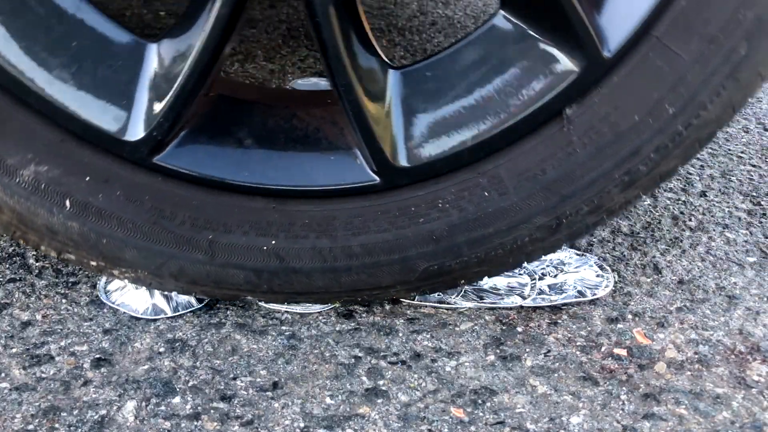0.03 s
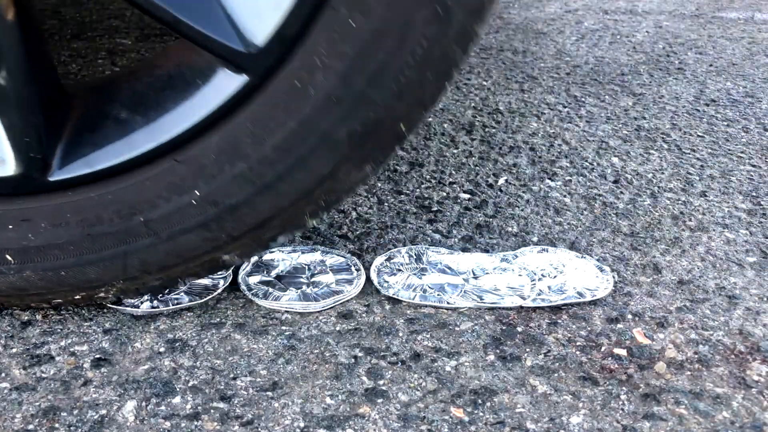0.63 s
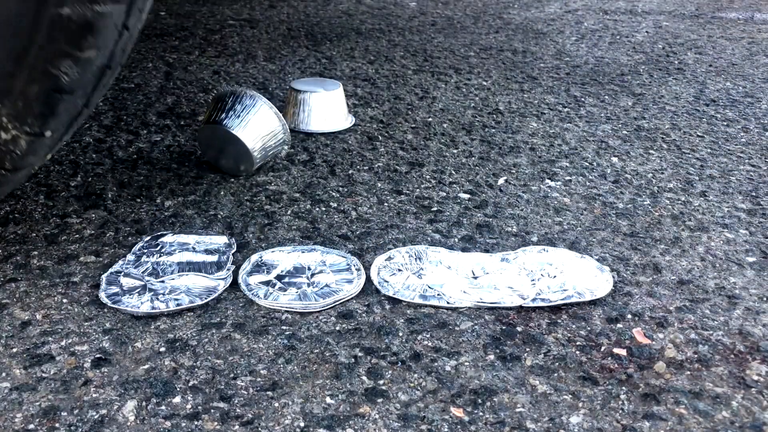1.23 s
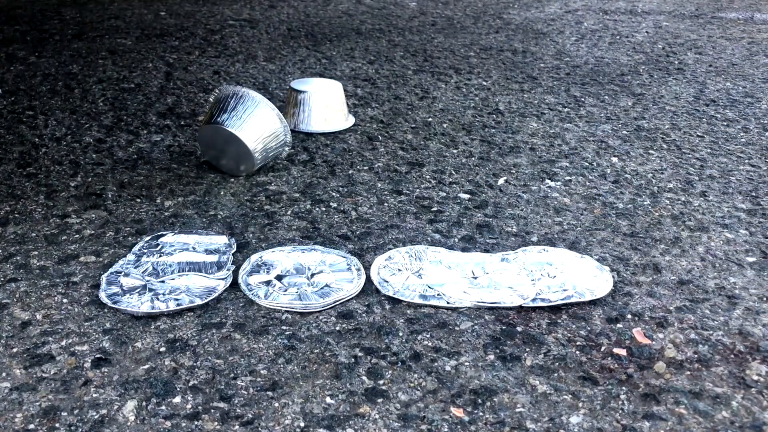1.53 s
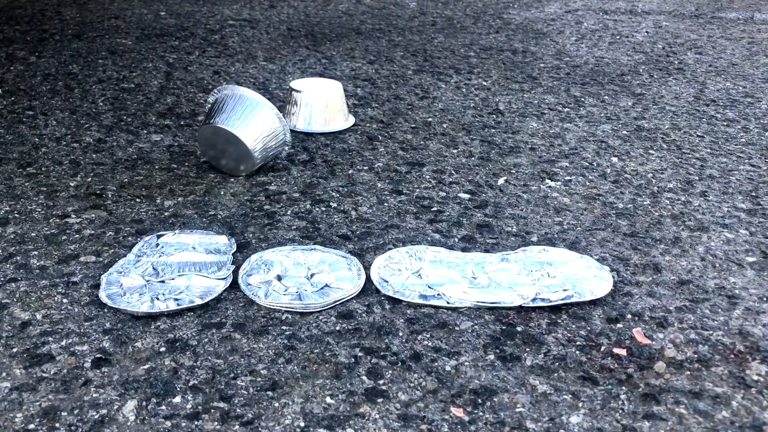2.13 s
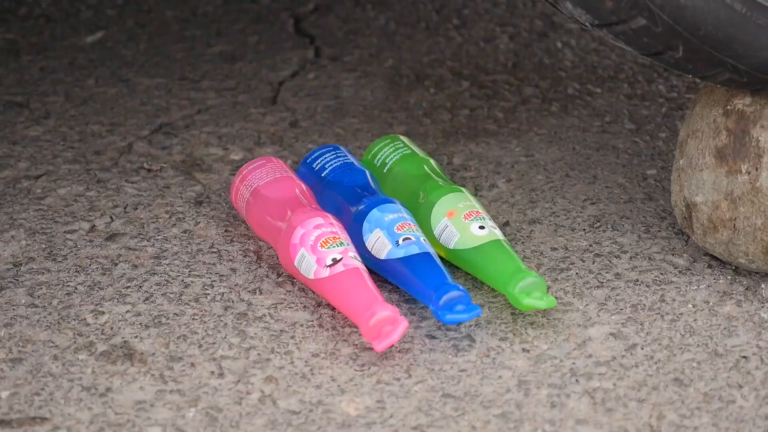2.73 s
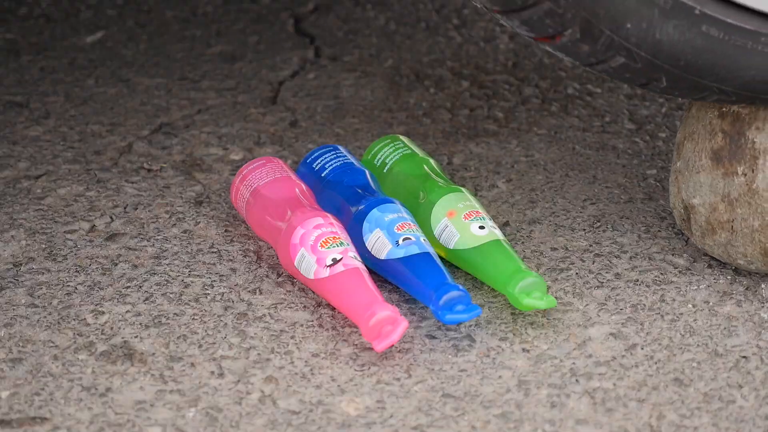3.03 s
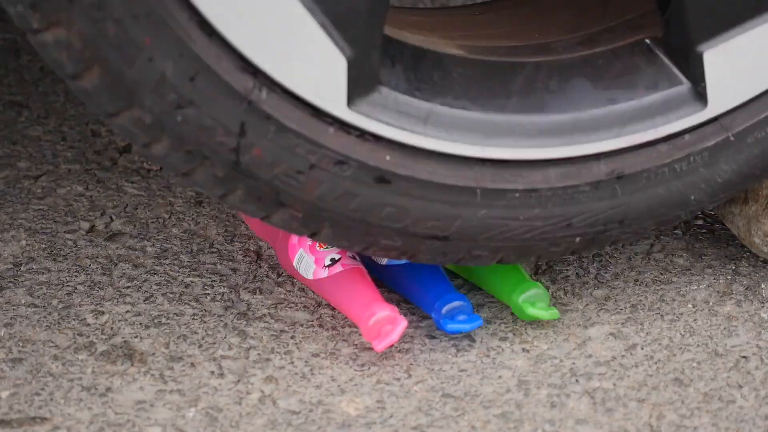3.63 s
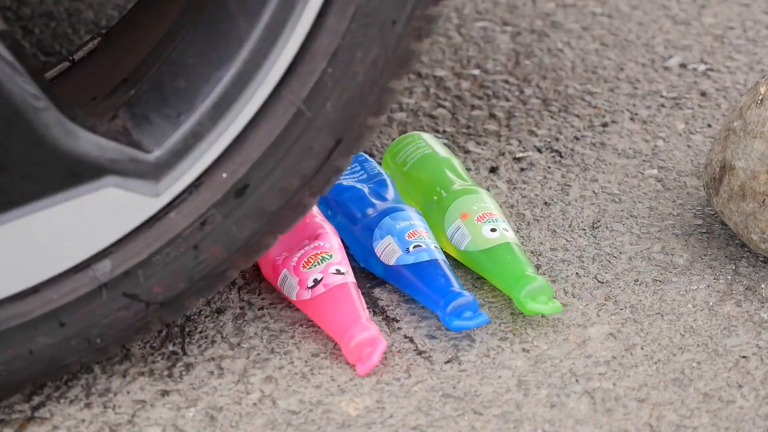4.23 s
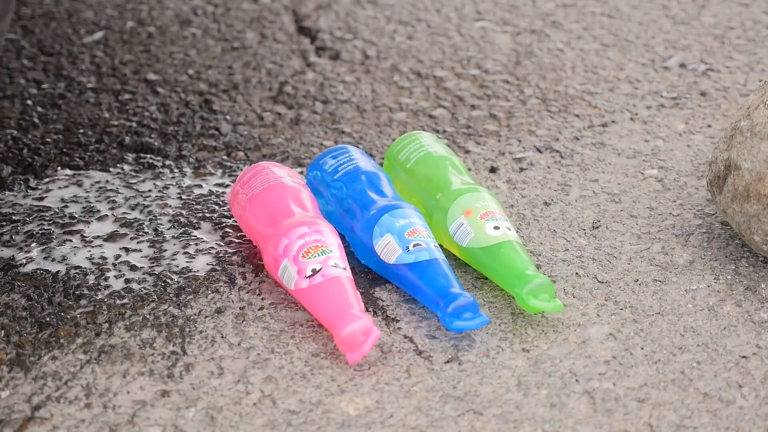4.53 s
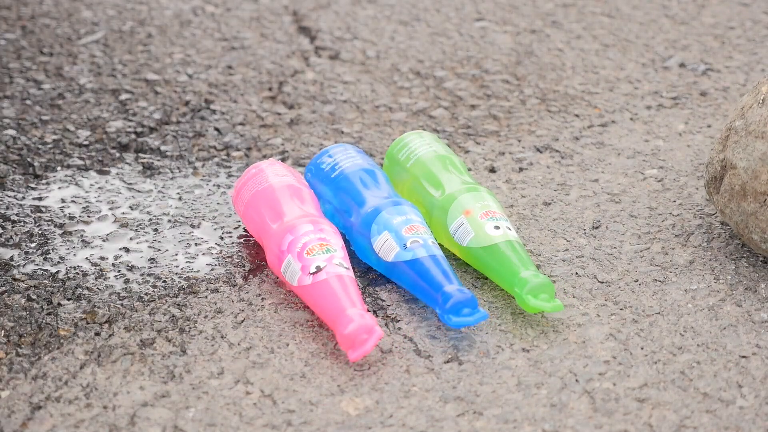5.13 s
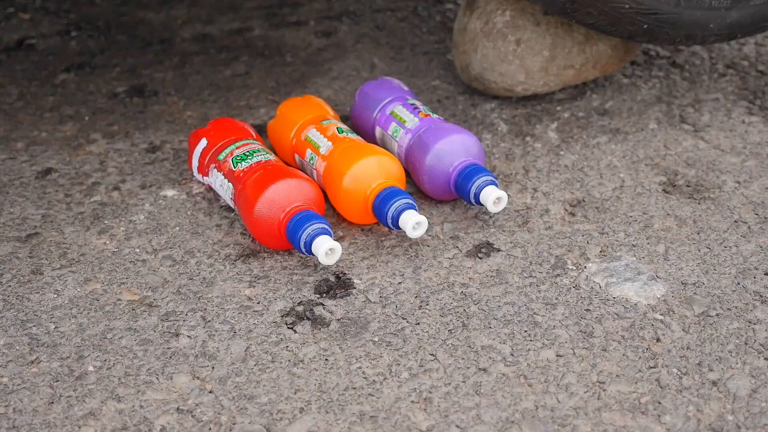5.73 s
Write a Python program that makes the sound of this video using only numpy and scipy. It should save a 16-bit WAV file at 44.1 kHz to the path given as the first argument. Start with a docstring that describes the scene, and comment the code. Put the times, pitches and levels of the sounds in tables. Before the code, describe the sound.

Outdoors on asphalt, a car creeps quietly over foil cups, which tick as they crease. The engine picks up, then labours and slows. Suddenly a much louder engine and fan roar, with a steady whine, is close to the microphone. A tyre crushes three full plastic bottles: loud pops, sharp cracks and a hiss of spray, then hollow knocks and faint fizzing. The roar continues until a brief, quieter idle.

```python
"""A car tyre crushes three filled plastic bottles: they pop, split and spray, then knock as it lets go.
Before that, the car creeps over foil cups on asphalt: foil ticks, the engine picks up, lugs and fades.
The crush is heard close to the roaring, whining engine bay, which the tyre screens as it rolls in.
The recorder's gain control ducks at the bangs and recovers. A brief, quieter idle ends the scene."""
import sys
import numpy as np
from scipy import signal
from scipy.fft import rfft, irfft
from scipy.io import wavfile

SR = 44100
rng = np.random.default_rng(int(sys.argv[2]) if len(sys.argv) > 2 else 0)


def pcm_store(signal):
    """Save signal as 16-bit PCM."""
    levels = np.round(np.clip(np.atleast_2d(signal), -1, 1) * 32767)
    wavfile.write(sys.argv[1], SR, levels.astype(np.int16).T)


N = 258867
TIME_S = np.arange(N) / SR

# Table levels are relative; the functions add their own gains.
# Engine speed. Each row: time in seconds, firing rate in Hz.
FIRING_RATE = [(0.0, 41.7), (0.35, 41.2), (0.73, 46.2), (1.4, 50.9), (1.67, 50.8), (1.79, 46.0),
               (1.86, 41.0), (1.92, 40.1), (2.0, 33.7), (2.1, 29.6), (2.3, 28.6), (2.65, 24.0)]
# Low exhaust harmonics. Each row: multiple of the firing rate, level in dB.
EXHAUST_HARMONICS = [(1, 14), (2, -4), (3, -3.5), (4, -9), (5, -6), (6, -18), (7, -3), (8, -8), (9, -5.5),
                     (10, -9.5), (11, -11), (12, -17), (13, -12), (14, -18), (15, -10), (16, -13)]
# Exhaust pipe resonances. Each row: frequency in Hz, width in Hz, gain in dB.
EXHAUST_MODES = [(125, 26, 0.5), (216, 16, 0)]
# Rolling and engine noise. Each row: time in seconds, rumble in dB, hiss in dB.
ROLLING_LEVELS = [(0, -52, -50), (.45, -51, -53), (1.6, -48.5, -53.5), (2.07, -43, -56.5),
                  (2.15, -48.5, -59.5), (2.65, -52, -63)]
# Its spectrum. Each row: frequency in Hz, density in dB.
ROLLING_SPECTRUM = [(22, -20), (45, -5), (70, 0), (120, -1.5), (180, 3.5), (240, -1.5), (300, -2),
                    (450, -3.5), (580, -7), (800, -7), (1100, -13), (1600, -17), (2600, -23), (5000, -26),
                    (8000, -33.5), (16000, -36)]
# Body and fan drones. Each row: frequency in Hz, level in dB.
BODY_DRONES = [(215, -10), (300, -16), (377, -16.5), (824, -18)]
# Hardest firings. Each row: start in seconds, level in dB, pitch in Hz, width in Hz, t60 in seconds.
LUG_FIRINGS = [(1.9595, -18, 1100, 700, 0.016), (2.2865, -35, 800, 500, .02),
               (2.3215, -36, 800, 500, 0.016)]
# Foil creasing. Each row: start in seconds, level in dB, pitch in Hz, width in Hz, t60 in seconds.
FOIL_CREASES = [(.1056, -30, 2910, 300, 0.013), (.1058, -24, 8000, 9000, .008),
                (.1059, -26, 1800, 1200, .011), (.1968, -26, 1500, 1100, 0.012),
                (.197, -33, 3700, 1500, .012), (.2018, -29, 6000, 9000, .009),
                (.2019, -30, 2200, 2000, .008), (.2485, -24, 8700, 3000, .0068),
                (.258, -24.5, 4600, 3400, 0.0084), (.2582, -28, 1900, 900, .012),
                (.302, -30, 14900, 2500, .009), (.4115, -30, 13000, 5000, .009)]
# Hum of the slowing engine. Each row: time in seconds, pitch in Hz, level in dB.
SLOWING_HUM = [(1.66, 100, -66), (1.75, 98, -46), (1.81, 102.4, -45), (1.865, 126, -54), (1.93, 120, -51),
               (2.0, 102.8, -48), (2.08, 100, -52), (2.17, 92.6, -69)]
# Whine running down. Each row: time in seconds, pitch in Hz, level in dB.
SLOWING_WHINE = [(1.9, 2520, -77), (2.1, 2500, -62), (2.25, 2350, -69), (2.45, 2190, -69),
                 (2.65, 2090, -77)]
# Grit cracking. Each row: start in seconds, level in dB, pitch in Hz, width in Hz, t60 in seconds.
GRIT_CRACKS = [(1.75, -36, 3200, 3000, 0.017), (1.767, -37, 2000, 1400, .025),
               (2.074, -39.5, 3670, 1200, 0.073), (3.655, -13, 4600, 1500, 0.018),
               (4.4525, -18, 3800, 4000, 0.0072), (4.5403, -25, 5000, 5000, .006),
               (4.6545, -18, 5000, 5000, 0.0066), (5.1225, -11, 4500, 5000, 0.0066)]
# Fan and engine roar. Each row: frequency in Hz, density in dB.
ROAR_SPECTRUM = [(24, -17), (40, -18.5), (91, -2), (204, -4.5), (320, -2), (433, -2), (831, -4.5),
                 (1210, -4.5), (1440, -7), (1900, -6.5), (2050, -6.5), (2570, -8.5), (4930, -16.5),
                 (8990, -25.5), (11800, -25.5), (16000, -33)]
# Engine bay resonances. Each row: frequency in Hz, width in Hz, gain in dB.
ENGINE_BAY_MODES = [(355, 40, -6), (438, 30, -3.5), (536, 26, 0), (600, 50, -7), (722, 28, -2),
                    (950, 18, -2), (1200, 30, -5), (1365, 18, -9), (1610, 45, -9), (2322, 22, -8),
                    (3136, 18, -6), (3320, 20, -4), (3625, 22, -4), (4912, 35, -4), (5042, 50, -3.5),
                    (6410, 70, -5), (8300, 150, -7), (9950, 300, -10), (11700, 250, -3), (12200, 200, -5),
                    (13900, 200, -6)]
# Four roar bands, bass to treble. Each row: gain in the open in dB, gain behind the tyre in dB.
ROAR_BAND_GAINS = [(1.5, -4), (-1, -8), (-3.5, -6), (1.5, -7.5)]
# Rotation harmonics. Each row: pitch in Hz, level in dB, swell share 0-1, loss under the car in dB.
WHINE_TONES = [(1200, -24, 0, 0), (1600.5, -22.5, 0, 1), (2000.7, -12, 1, 0), (2400.8, -15.5, .3, 5.5),
               (2801.5, -25, 0, 3)]
# Whine swells behind the tyre. Each row: centre in seconds, level in dB.
SCREENED_SWELLS = [(4.5, -9), (4.86, -4.5), (5.31, 1)]
# Walls folding under the tread. Each row: start in seconds, level in dB, t60 in seconds.
WALL_FOLDS = [(3.5, -24, .2), (3.615, -29, .4), (3.725, -29.5, 0.35), (3.8, -17, 0.34), (4.105, -19, 0.24),
              (4.21, -36, 0.63)]
# Bottles popping. Each row: start in seconds, level in dB, pitch in Hz.
BOTTLE_POPS = [(3.547, 7, 420), (3.7168, -2, 497), (3.7253, -4.5, 450), (3.7935, 20, 250),
               (3.7955, 19, 653), (3.9078, 10, 190)]
# Air in the first bottle. Each row: frequency in Hz, level in dB, t60 in seconds.
CAVITY_MODES = [(204, -25.5, 0.57), (308, -1.5, 0.018), (442, -29, 0.11), (566, -20, 0.1)]
# Plastic splitting. Each row: start in seconds, snap in dB, pitch in Hz, t60 in seconds, tear in dB.
WALL_SPLITS = [(3.7154, -12, 4500, .002, -20.5), (3.7919, -9, 2000, .004, -12.5),
               (3.7937, 31, 1910, 0.0024, 21.5), (3.806, 27, 1570, .003, 1), (3.821, 23, 1800, .003, 1),
               (3.896, 29.5, 2870, 0.001, 6), (3.9078, 35, 3450, 0.0021, 12),
               (4.091, -17, 3870, .0012, -13)]
# Bottle wall resonances. Each row: frequency in Hz, width in Hz, gain in dB.
WALL_MODES = [(820, 110, 3.5), (1670, 76, 6.5), (2220, 260, 4.5), (3070, 260, 3.5), (3880, 270, -3.5),
              (4850, 390, 4), (5400, 170, 0), (5960, 1000, -3.5), (8200, 1600, -4.5), (11000, 4400, -8)]
# Split lips singing. Each row: start in seconds, level in dB, pitch in Hz, t60 in seconds.
LIP_SQUEAKS = [(3.805, -8, 11200, .12), (3.925, -18, 4850, .2), (3.93, -15.5, 3290, .45)]
# Drink jets. Each row: start in seconds, level in dB, t60 in seconds, pitch in Hz, gush share 0-1.
DRINK_JETS = [(3.809, 9.5, 0.11, 7500, 0.56), (3.847, 2, 0.44, 1900, 0.65), (3.928, -8, 0.28, 1840, 0.5)]
# Spray hiss. Each row: frequency in Hz, density in dB.
SPRAY_SPECTRUM = [(240, -34), (400, -28), (489, -9), (697, -12), (1960, -8), (3750, -20), (4440, -7),
                  (9040, -20), (11400, -18), (16000, -27)]
# Flat shells springing back. Each row: start in seconds, level in dB, pitch in Hz.
SHELL_KNOCKS = [(4.0808, -2, 1000), (4.0832, -2, 1470), (4.0878, -4, 1950), (4.0905, -3, 1000),
                (4.137, -12, 950), (4.1497, 0.5, 1790), (4.1505, 3.5, 1007), (4.166, -9, 643)]
# Flat shell resonances. Each row: frequency in Hz, width in Hz, gain in dB.
SHELL_MODES = [(815, 70, 6.5), (1190, 70, 3), (2360, 110, 6.5)]
# Idling engine. Each row: frequency in Hz, density in dB.
IDLE_SPECTRUM = [(35, -63), (60, -11), (338, -7.5), (427, -5.5), (651, -7), (924, -8), (2050, -7.5),
                 (16000, -34.5)]

LUG_START_S, LUG_RISE_S = 1.62, 0.26
ROAR_START_S, ROAR_END_S = 2.647, 5.733
SCREEN_START_S = 3.527   # tyre rolls between bay and microphone
OVERHEAD_START_S, OVERHEAD_RISE_S = 4.57, 0.64   # underbody slides over the microphone


def from_db(db):
    """Decibels to gain."""
    return 10 ** (np.asarray(db) / 20)


def unit_rms(x):
    """Scale to rms 1."""
    return x / np.sqrt(np.mean(x ** 2) + 1e-20)


def curves(rows):
    """Each column after the time, interpolated per sample."""
    times_s, *columns = np.transpose(rows)
    return [np.interp(TIME_S, times_s, column) for column in columns]


def drift(rate_hz):
    """Random wander, mostly below rate_hz; rms 1."""
    hz = np.arange(N // 2 + 1) * SR / N
    return unit_rms(irfft(rfft(rng.standard_normal(N)) / (1 + (hz / rate_hz) ** 2), N))


def noise(spectrum):
    """Noise of a given spectrum; rms 1."""
    hz = np.maximum(np.arange(N // 2 + 1) * SR / N, 1)
    points_hz, db = np.transpose(spectrum)
    gain = from_db(np.interp(np.log(hz), np.log(points_hz), db))
    return unit_rms(irfft(rfft(rng.standard_normal(N)) * gain, N))


def low_pass(x, edge_hz):
    """Second-order treble cut."""
    return signal.sosfilt(signal.butter(2, edge_hz, fs=SR, output="sos"), x)


def high_pass(x, edge_hz):
    """Second-order bass cut."""
    return signal.sosfilt(signal.butter(2, edge_hz, "high", fs=SR, output="sos"), x)


def muffle(x, edge_hz):
    """Zero-phase treble cut."""
    return signal.sosfiltfilt(signal.butter(2, edge_hz, fs=SR, output="sos"), x)


def crossover(x, edge_hz):
    """The parts below and above an edge."""
    low = muffle(x, edge_hz)
    return low, x - low


def resonate(x, hz, width_hz):
    """One resonance, peak gain 1."""
    r = np.exp(-np.pi * width_hz / SR)
    feedback = [1, -2 * r * np.cos(2 * np.pi * hz / SR), r * r]
    return signal.lfilter(np.array([1, 0, -1]) * (1 - r * r) / 2, feedback, x)


def add_modes(x, modes):
    """A signal plus the resonances it drives."""
    return x + sum(from_db(db) * resonate(x, hz, width_hz) for hz, width_hz, db in modes)


def ramp(start_s, rise_s):
    """Linear rise from 0 to 1, then hold."""
    return np.clip((TIME_S - start_s) / rise_s, 0, 1)


def decay(start_s, t60_s):
    """Jump to 1, then die away."""
    age_s = TIME_S - start_s
    return (age_s >= 0) * np.exp(-np.log(1000) * np.clip(age_s / t60_s, 0, 10))


def swell(start_s, rise_s, t60_s):
    """Rise to 1, then die away."""
    past_peak_s = TIME_S - start_s - rise_s
    return ramp(start_s, rise_s) * np.exp(-np.log(1000) * np.clip(past_peak_s / t60_s, 0, 10))


def ring(start_s, hz, t60_s):
    """A struck mode."""
    return decay(start_s, t60_s) * np.sin(2 * np.pi * hz * (TIME_S - start_s))


def grains(per_s, hz, width_hz):
    """Random clicks into one broad resonance; rms 1."""
    clicks = (rng.random(N) < per_s / SR) * rng.standard_normal(N)
    return unit_rms(resonate(clicks + 1e-18, hz, width_hz))


def ticks(rows):
    """Short noise bursts: a ping if narrow, a crackle if wide."""
    white = rng.standard_normal(N)
    bursts = np.zeros(N)
    for start_s, db, hz, width_hz, t60_s in rows:
        burst = resonate(decay(start_s, t60_s) * white + 1e-18, hz, width_hz)
        bursts += from_db(db) * burst / np.std(resonate(white[:SR], hz, width_hz))
    return bursts


def buckles(rows, ring_t60_s, rattle_t60_s, rattle_db=-18):
    """A wall gives way: hollow thump, rattle in proportion."""
    rattle = from_db(rattle_db) * unit_rms(resonate(rng.standard_normal(N), hz=1400, width_hz=1800))
    return sum(from_db(db) * (ring(start_s, hz, ring_t60_s) + decay(start_s, rattle_t60_s) * rattle)
               for start_s, db, hz in rows)


def under_car(x, echo_db, t60_s):
    """Dense, short reflections between road and underbody."""
    age_s = TIME_S[:SR // 8]
    echoes = rng.standard_normal(len(age_s)) * np.exp(-np.log(1000) * age_s / t60_s) * (age_s > .002)
    return x + from_db(echo_db) * signal.fftconvolve(x, echoes / np.linalg.norm(echoes))[:N]


def exhaust(firing_hz, phase, cruise_hz=46.8, db_per_octave=9.5, waver_db=2, mic_edge_hz=51):
    """Firing harmonics grow with engine speed and boom as they pass the pipe's resonances."""
    harmonics = EXHAUST_HARMONICS + [(order, -17) for order in range(17, 23)]
    note = sum(from_db(db + waver_db * drift(1)) * np.sin(order * phase + rng.uniform(0, 2 * np.pi))
               for order, db in harmonics)
    piped = add_modes(note, EXHAUST_MODES)
    heard = high_pass(high_pass(piped, mic_edge_hz), mic_edge_hz)
    return np.sqrt(2) * from_db(-53 + db_per_octave * np.log2(firing_hz / cruise_hz)) * heard


def creeping_car(throb_depth=0.19, lug_dip_db=-3, leave_s=2.14, leave_db_per_s=10):
    """Rolling noise throbs twice per firing; exhaust and drones fade as the car moves off."""
    (firing_hz,) = curves(FIRING_RATE)
    rumble_db, hiss_db = curves(ROLLING_LEVELS)
    phase = 2 * np.pi * np.cumsum(firing_hz * (1 + 0.0016 * drift(12))) / SR
    note = exhaust(firing_hz, phase)
    low, high = crossover(noise(ROLLING_SPECTRUM), edge_hz=1060)
    rumble = from_db(rumble_db - 1.5 + lug_dip_db * ramp(LUG_START_S, LUG_RISE_S)) * unit_rms(low)
    hiss = from_db(hiss_db + 1.5) * unit_rms(high)
    drones = sum(from_db(rumble_db + db + 2 * drift(4.5)) * np.sin(2 * np.pi * hz * TIME_S + drift(2.1))
                 for hz, db in BODY_DRONES)
    fade = from_db(-leave_db_per_s * np.maximum(TIME_S - leave_s, 0))
    throb = 1 + throb_depth * np.sin(2 * phase)
    return fade * (note + np.sqrt(2) * drones) + throb * (rumble + hiss)


def firing_knock(lug_boost_db=19.5, uneven_db=1.5, thud_hz=350, t60_s=0.012):
    """Each firing thuds and rattles at its own strength; the blows stand out once the engine lugs."""
    (firing_hz,) = curves(FIRING_RATE)
    rumble_db, _ = curves(ROLLING_LEVELS)
    level_db = rumble_db - 11 + lug_boost_db * ramp(LUG_START_S, LUG_RISE_S)
    cycles = np.cumsum(firing_hz) / SR
    cycles = cycles - np.interp(LUG_FIRINGS[0][0], TIME_S, cycles) % 1 + 1   # align to hardest firing
    strength_db = uneven_db * np.clip(rng.standard_normal(N), -1, 1)[cycles.astype(int)]
    age_s = (cycles % 1) / firing_hz
    rattle = unit_rms(resonate(rng.standard_normal(N), hz=600, width_hz=900))
    thud = np.sin(2 * np.pi * thud_hz * age_s)
    blows = from_db(level_db + strength_db) * np.exp(-np.log(1000) * age_s / t60_s) * (rattle + thud)
    return muffle(blows + from_db(-15) * ticks(LUG_FIRINGS), edge_hz=1350)


def foil(gain_db=-8.5):
    """The cups tick as they crease under the tyre."""
    return from_db(gain_db) * ticks(FOIL_CREASES)


def slowing_tones(waver_db=3, rough_rad=0.64):
    """A low hum flares and falls, and a rough, thin whine runs down as the engine slows."""
    hum_hz, hum_db = curves(SLOWING_HUM)
    whine_hz, whine_db = curves(SLOWING_WHINE)
    hum = from_db(hum_db + waver_db * drift(21)) * np.sin(2 * np.pi * np.cumsum(hum_hz) / SR)
    whine_gain = from_db(whine_db + waver_db * drift(40))
    whine_phase = 2 * np.pi * np.cumsum(whine_hz) / SR + rough_rad * drift(60)
    return np.sqrt(2) * (hum + whine_gain * np.sin(whine_phase))


def grit(gain_db=-9.5):
    """Grains crack under the tyres."""
    return from_db(gain_db) * ticks(GRIT_CRACKS)


def rotor_whine(open_db=3, screened_db=-15.5, swell_s=0.14, waver_db=2):
    """Tones of a spinning part; the strongest comes and goes behind the tyre, upper ones fade."""
    steady = from_db(open_db + ramp(SCREEN_START_S, swell_s) * (screened_db - open_db))
    swells = sum(from_db(db) * np.exp(-((TIME_S - centre_s) / swell_s) ** 2)
                 for centre_s, db in SCREENED_SWELLS)
    swell_db = 20 * np.log10(steady + swells)
    overhead = ramp(OVERHEAD_START_S, OVERHEAD_RISE_S)
    tones = np.zeros(N)
    for hz, db, share, loss_db in WHINE_TONES:
        level_db = db + share * swell_db - loss_db * overhead + waver_db * drift(12)
        tones += from_db(level_db) * np.sin(2 * np.pi * hz * TIME_S + 0.13 * drift(11))
    return np.sqrt(2) * tones


def engine_bay(whine, gain_db=-21.5, flutter_db=0.58, boom_db=-21, whine_loss_db=3):
    """Fan and engine roar in the bay; the tyre screens the treble most, the underbody booms overhead."""
    screened = ramp(SCREEN_START_S, rise_s=0.31)
    air = under_car(noise(ROAR_SPECTRUM), echo_db=-10, t60_s=0.026)
    air = unit_rms(add_modes(air, ENGINE_BAY_MODES))
    bass, above_bass = crossover(air * from_db(flutter_db * drift(72)), edge_hz=125)
    low_mid, above_low_mid = crossover(above_bass, edge_hz=820)
    mid, treble = crossover(above_low_mid, edge_hz=1180)
    roar = sum(from_db(open_db + screened * (behind_db - open_db)) * band
               for band, (open_db, behind_db) in zip((bass, low_mid, mid, treble), ROAR_BAND_GAINS))
    overhead = ramp(OVERHEAD_START_S, OVERHEAD_RISE_S)
    boom = overhead * from_db(boom_db) * unit_rms(resonate(air, hz=165, width_hz=27))
    bay = roar + boom + from_db(-whine_loss_db * screened) * whine
    return from_db(gain_db) * ramp(ROAR_START_S, rise_s=0.023) * bay


def crunch(rise_s=0.015):
    """Runs of small, dull folds, smothered by the rubber."""
    folds = muffle(grains(per_s=650, hz=460, width_hz=330), edge_hz=900)
    envelope = sum(from_db(db) * swell(start_s, rise_s, t60_s) for start_s, db, t60_s in WALL_FOLDS)
    return envelope * unit_rms(high_pass(folds, edge_hz=270))


def pops(cavity_db=11.5, bass_edge_hz=200):
    """Full bottles thump; the first pop rings the air inside. A small body radiates little bass."""
    thumps = buckles(BOTTLE_POPS, ring_t60_s=0.0091, rattle_t60_s=0.074)
    first_s = BOTTLE_POPS[0][0]
    cavity = sum(from_db(cavity_db + db) * ring(first_s, hz, t60_s) for hz, db, t60_s in CAVITY_MODES)
    under_tyre = muffle(thumps + cavity, edge_hz=1050)
    return -high_pass(high_pass(under_tyre, bass_edge_hz), bass_edge_hz)


def cracks(overtone_ratio=1.86, overtone_db=-7.5, tear_t60_s=0.062, grain_db=3.5):
    """A sharp two-mode snap, then the split runs on as a grainy tear coloured by the wall."""
    grainy = rng.standard_normal(N) * from_db(grain_db * drift(2600))
    tear = unit_rms(sum((-1) ** k * from_db(db) * resonate(grainy, hz, width_hz)
                        for k, (hz, width_hz, db) in enumerate(WALL_MODES)))
    splits = np.zeros(N)
    for start_s, snap_db, hz, t60_s, tear_db in WALL_SPLITS:
        overtone = from_db(overtone_db) * ring(start_s, overtone_ratio * hz, t60_s / 2)
        snap = ring(start_s, hz, t60_s) + overtone
        splits += from_db(tear_db) * decay(start_s, tear_t60_s) * tear - from_db(snap_db) * snap
    return high_pass(splits, edge_hz=520)


def squeaks(rise_s=0.029, width_ratio=0.0054):
    """A split lip sings, narrow and unsteady, as drink is forced through."""
    white = rng.standard_normal(N)
    return sum(from_db(db) * swell(start_s, rise_s, t60_s)
               * unit_rms(resonate(white, hz, width_ratio * hz))
               for start_s, db, hz, t60_s in LIP_SQUEAKS)


def spray(rise_s=0.0082, sputter_db=1, width_ratio=0.88):
    """Drink sputters from the splits, each jet around its own pitch, and dies with the pressure."""
    hiss = unit_rms(under_car(noise(SPRAY_SPECTRUM), echo_db=-13, t60_s=0.042))
    white = rng.standard_normal(N)
    jets = np.zeros(N)
    for start_s, db, t60_s, hz, share in DRINK_JETS:
        gush = unit_rms(resonate(white, hz, width_ratio * hz))
        jet = unit_rms((1 - share) * hiss + share * gush)
        jets += from_db(db) * swell(start_s, rise_s, t60_s) * jet
    return from_db(sputter_db * drift(250)) * jets


def splash(gain_db=-22):
    """Droplets rain on the asphalt."""
    drops = grains(per_s=7000, hz=5000, width_hz=9000)
    return from_db(gain_db) * swell(start_s=3.965, rise_s=0.11, t60_s=0.73) * drops


def wet_tread(gain_db=-33):
    """The tread peels off the wet road, crackling fainter as it rolls away."""
    crackle = unit_rms(muffle(grains(per_s=700, hz=2600, width_hz=900), edge_hz=3600))
    return from_db(gain_db) * swell(start_s=4.04, rise_s=0.032, t60_s=6.6) * crackle


def creak(gain_db=-13):
    """The flattened walls unfold in small, dull slips."""
    slips = unit_rms(muffle(grains(per_s=3000, hz=1150, width_hz=1700), edge_hz=2700))
    return from_db(gain_db) * swell(start_s=4.078, rise_s=0.012, t60_s=0.35) * slips


def knocks():
    """Flat shells snap back and ring briefly, with no air inside to give bass."""
    hits = buckles(SHELL_KNOCKS, ring_t60_s=0.011, rattle_t60_s=0.056)
    shell = muffle(add_modes(hits, SHELL_MODES), edge_hz=2500)
    return high_pass(shell, edge_hz=560)


def foam(gain_db=-39.5):
    """Tiny bubbles burst as the puddle foams up and settles."""
    bubbles = grains(per_s=3500, hz=10000, width_hz=8000)
    return from_db(gain_db) * swell(start_s=4.27, rise_s=0.48, t60_s=5.3) * bubbles


def idle(whine, gain_db=-43.5):
    """Quiet, steady engine noise with the whine on top."""
    return from_db(gain_db) * (noise(IDLE_SPECTRUM) + whine)


def gain_control(x, threshold_db=-9.5, release_db_per_s=57, window_s=0.004, lookahead_s=0.0011):
    """Gain drops at once above the threshold and climbs back at a steady rate."""
    pole = np.exp(-1 / (window_s * SR))
    level_db = 10 * np.log10(signal.lfilter([1 - pole], [1, -pole], x[0] ** 2) + 1e-12)
    excess_db = np.maximum(level_db - threshold_db, 0)
    climb_db = release_db_per_s * TIME_S
    cut_db = np.maximum.accumulate(excess_db + climb_db) - climb_db
    return x * from_db(-np.interp(TIME_S + lookahead_s, TIME_S, cut_db))


def scene():
    """Cups, bottles and idle, cut together without a pause; mono."""
    whine = rotor_whine()
    cups = creeping_car() + firing_knock() + slowing_tones() + foil()
    bottles = engine_bay(whine) + crunch() + pops() + cracks() + spray() + squeaks()
    bottles += knocks() + creak() + splash() + foam() + wet_tread()
    stretches = np.select([TIME_S < ROAR_START_S, TIME_S < ROAR_END_S], [cups, bottles], idle(whine))
    return (stretches + grit())[None]


def record(dry, cutoff_hz=15900):
    """Gain ducks at each bang, the sharpest snaps still clip, the top is cut."""
    top_cut = signal.ellip(10, .1, 90, cutoff_hz, fs=SR, output="sos")
    return signal.sosfilt(top_cut, np.clip(gain_control(dry), -1, 1))


dry = scene()
out = record(dry)
pcm_store(out)
```